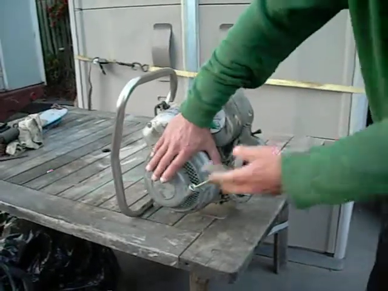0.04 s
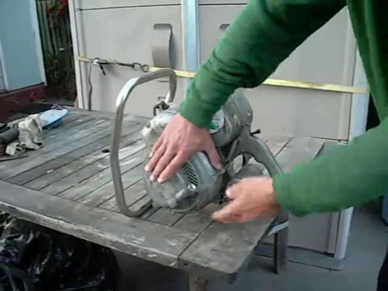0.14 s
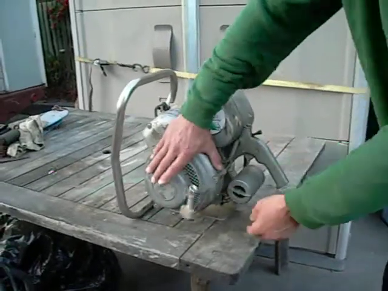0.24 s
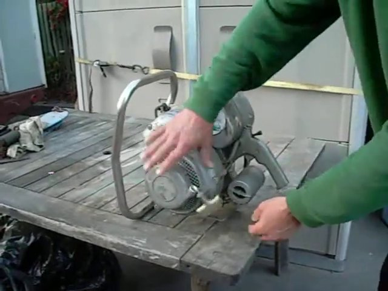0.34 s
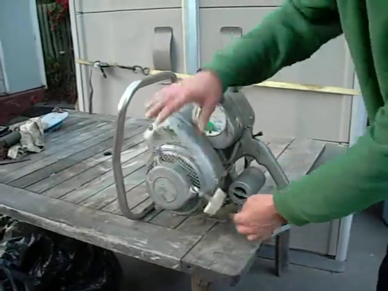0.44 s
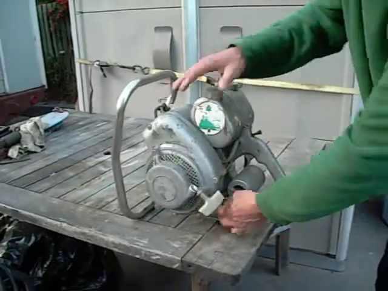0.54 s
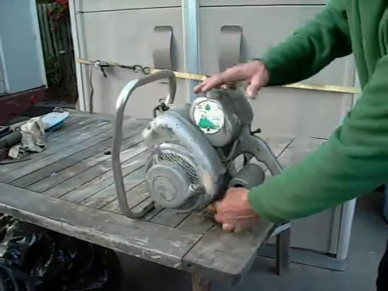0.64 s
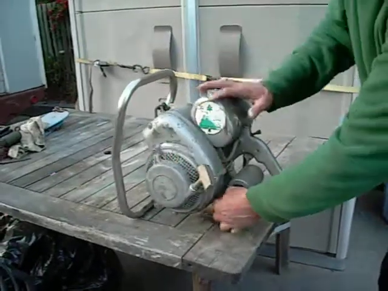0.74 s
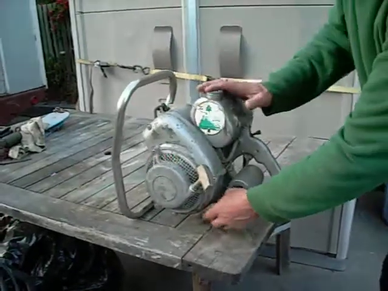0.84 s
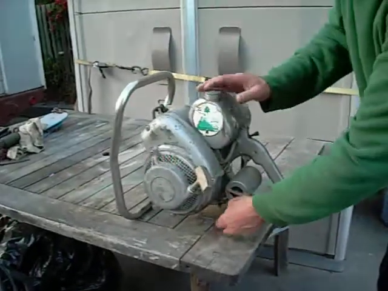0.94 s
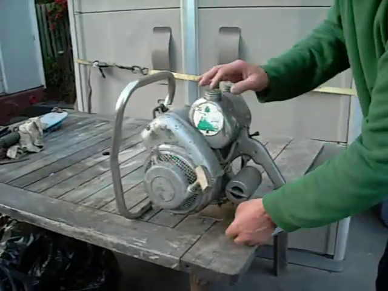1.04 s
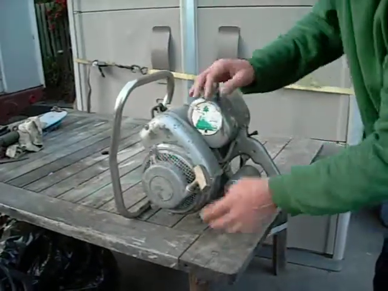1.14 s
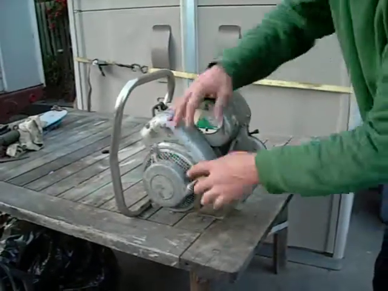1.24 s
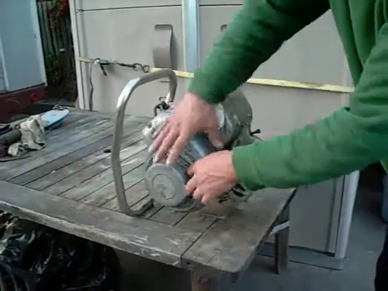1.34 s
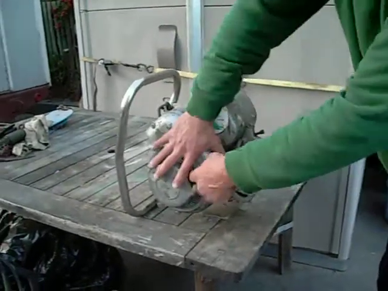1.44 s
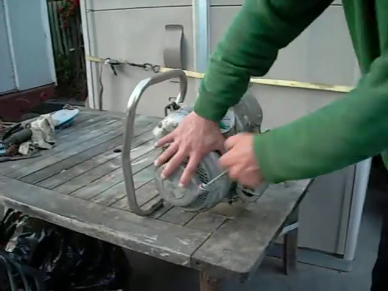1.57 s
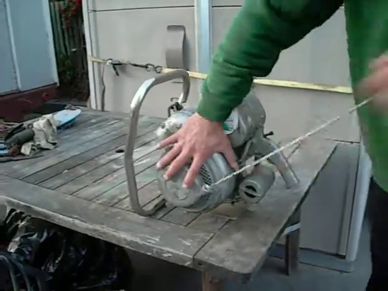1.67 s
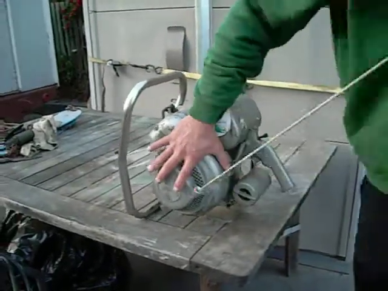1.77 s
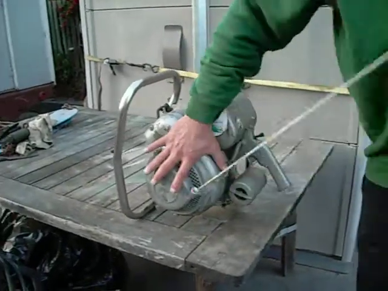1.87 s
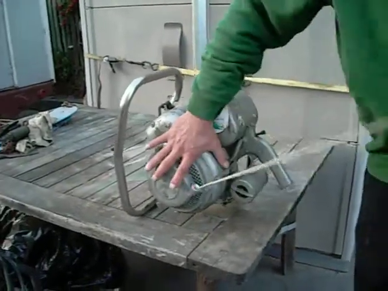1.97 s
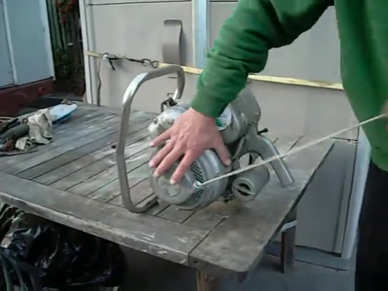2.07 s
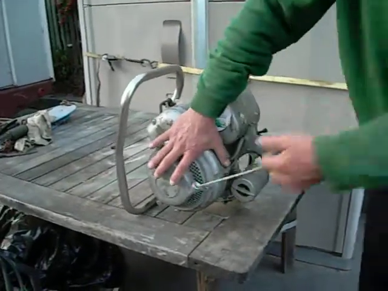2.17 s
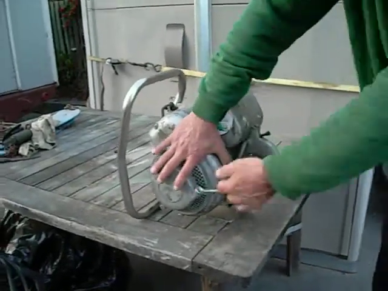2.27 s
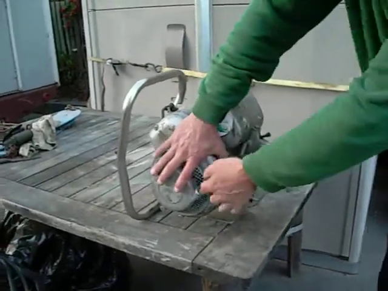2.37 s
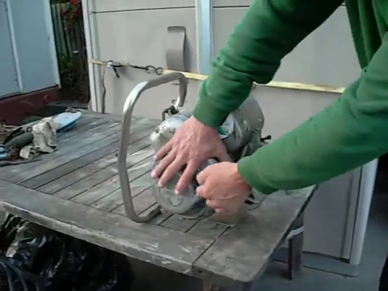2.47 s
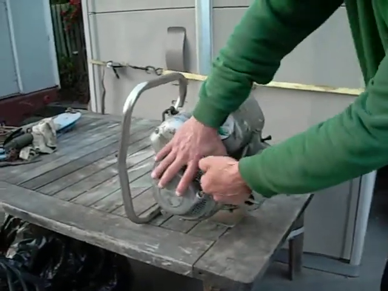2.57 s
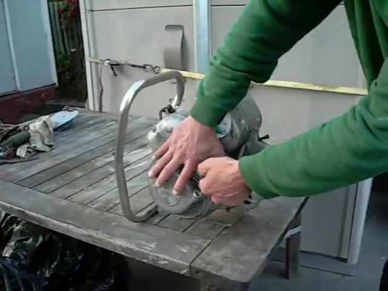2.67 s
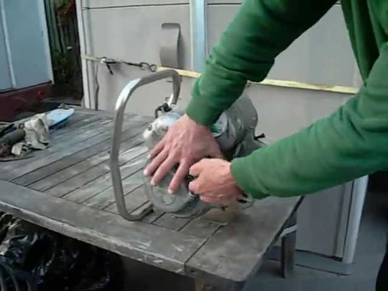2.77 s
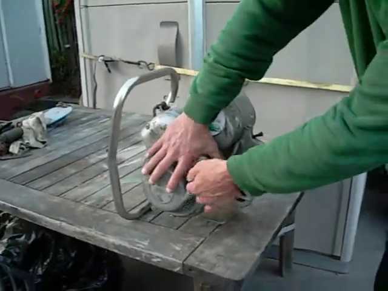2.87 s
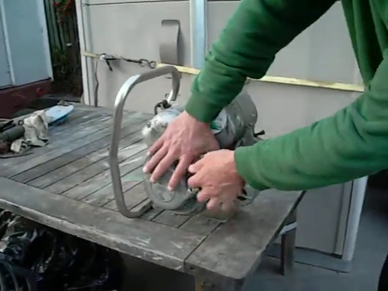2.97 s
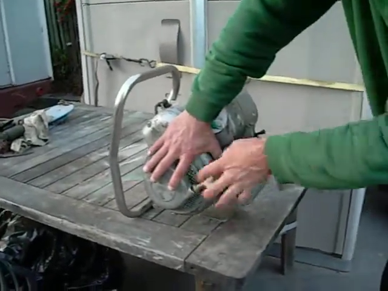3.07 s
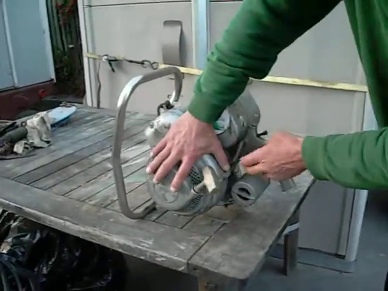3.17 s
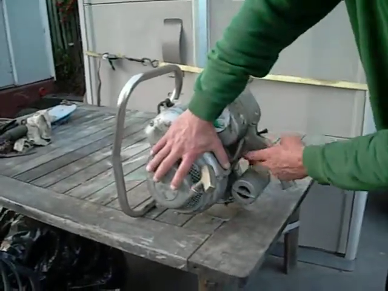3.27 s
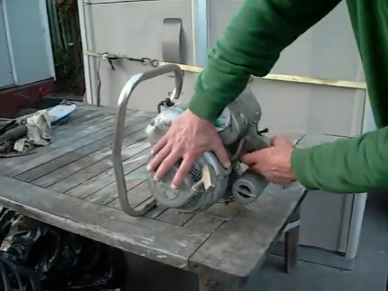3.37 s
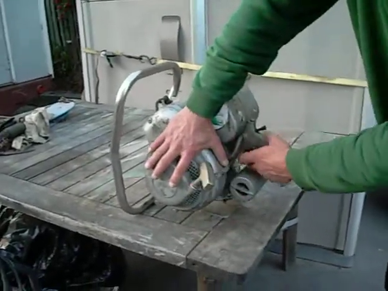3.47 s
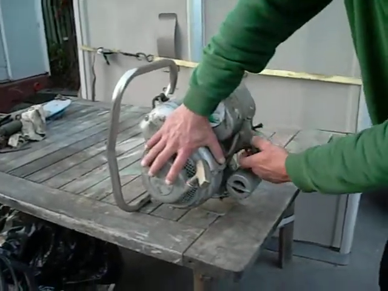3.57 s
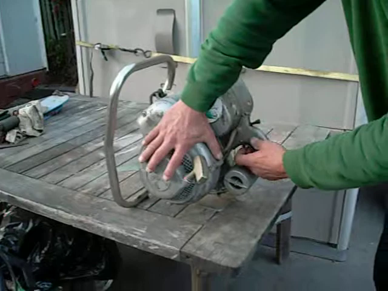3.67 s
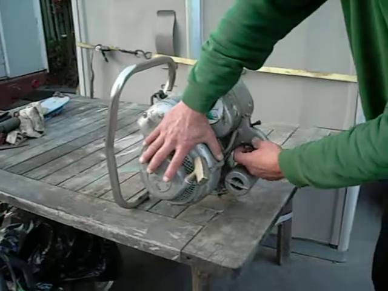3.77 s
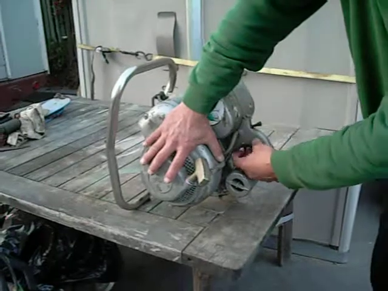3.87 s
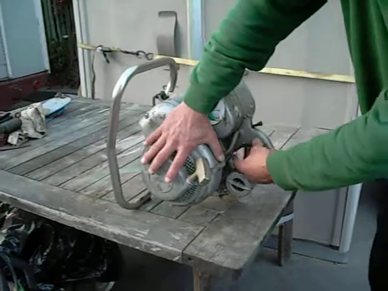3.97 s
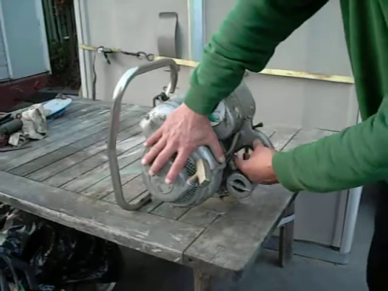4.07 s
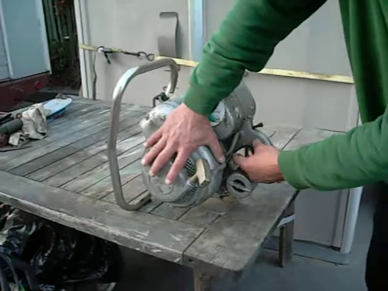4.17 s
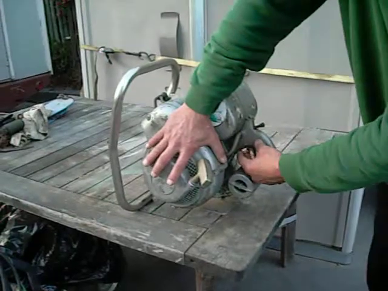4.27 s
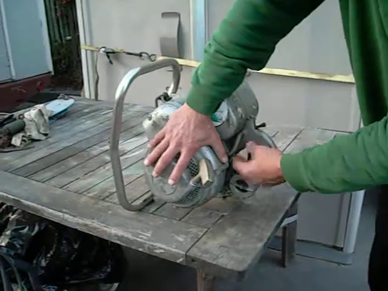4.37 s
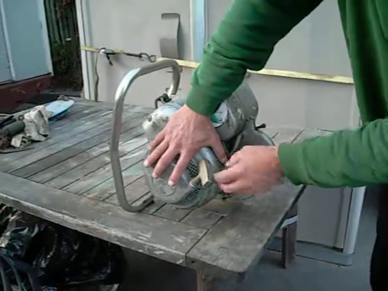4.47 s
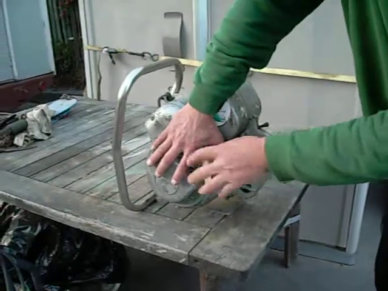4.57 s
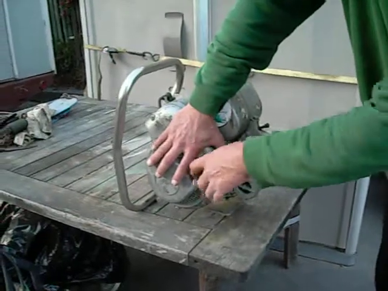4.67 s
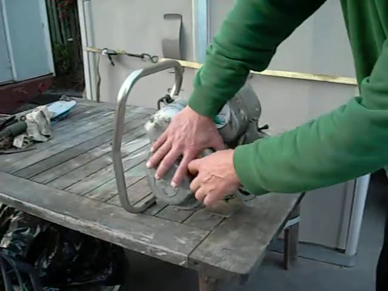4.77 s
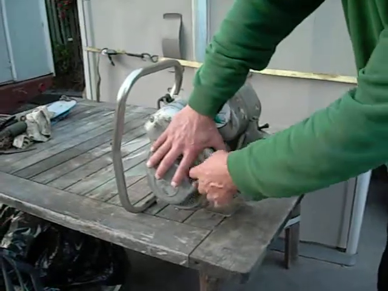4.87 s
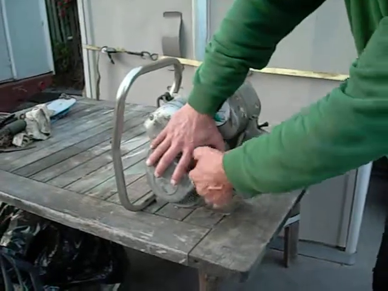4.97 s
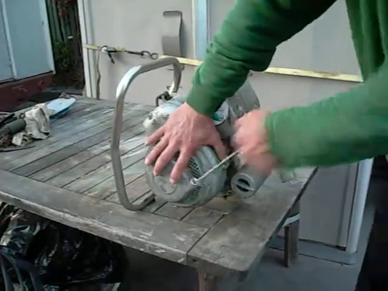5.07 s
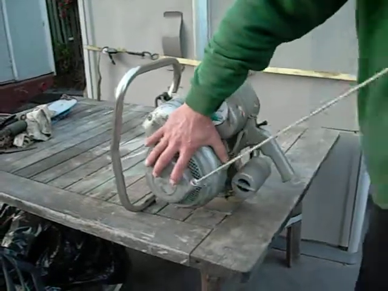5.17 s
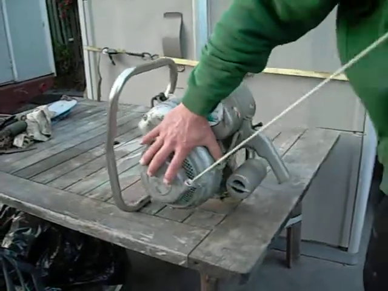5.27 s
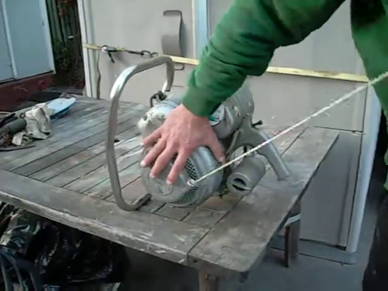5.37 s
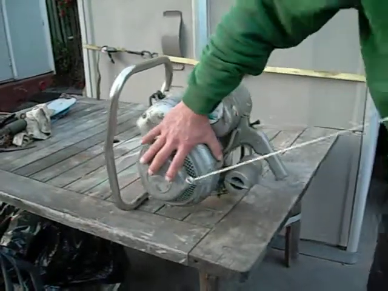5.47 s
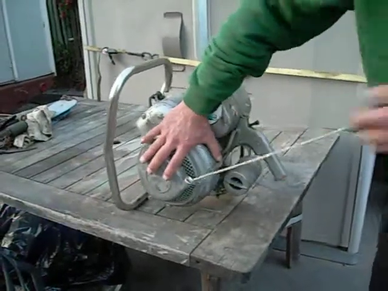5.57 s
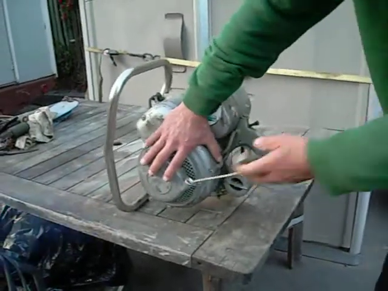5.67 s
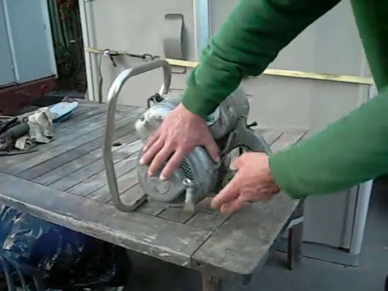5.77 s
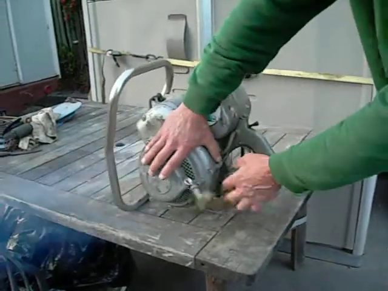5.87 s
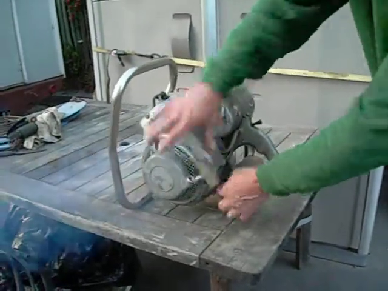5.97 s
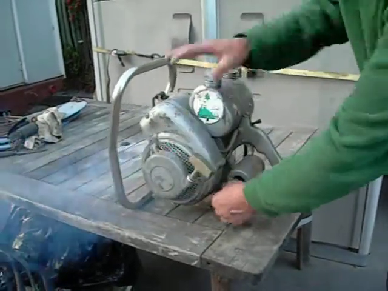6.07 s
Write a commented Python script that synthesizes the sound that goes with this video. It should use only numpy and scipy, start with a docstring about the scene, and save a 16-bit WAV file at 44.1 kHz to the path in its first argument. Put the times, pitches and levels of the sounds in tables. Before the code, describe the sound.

A two-stroke chainsaw putters down and stops with hard metal clanks. The rewinding starter squeals thinly among small ticks. A rope pull rasps and coughs briefly without catching, then come grip rattles and lever snaps over faint yard noise. The last pull catches, revving rapidly into a loud, buzzing roar. Outdoors, very close, dull and clipped microphone.

```python
"""In a yard beside a shed wall, an old two-stroke chainsaw on a wooden table is started by its rope, close to a
small overloaded microphone. It coasts to a stop, the rewinding rope makes the starter sing, a second pull fails,
levers snap, and the third pull catches. Exhaust puffs are timed by the crank and ring the muffler; at speed the
engine fires only every second or third turn. Shaken metal is dense noise bursts, struck metal is fading sines,
and the microphone clips it all and dulls it."""
import sys
import numpy as np
from scipy import signal
from scipy.fft import rfft, irfft
from scipy.io import wavfile

SR = 44100
rng = np.random.default_rng(int(sys.argv[2]) if len(sys.argv) > 2 else 0)


def transcribe(u):
    """Save the signal u as a 16-bit wav file named by the first command-line argument.

    u: samples, shape (n,) or (channels, n), limited to [-1, 1]; the rate is SR.
    q: integer samples, one column per channel.
    """
    v = np.clip(np.atleast_2d(u).T, -1, 1)
    q = np.round(v * 32767).astype(np.int16)
    wavfile.write(sys.argv[1], SR, q)


N = 269892
TIME = np.arange(N) / SR  # seconds

# All dB in the tables are relative levels.
# Outdoor background. Each row: frequency in Hz, level in dB per Hz.
YARD_COLOUR = [(20, -4), (45, -1), (100, -3.5), (200, -10), (400, -13), (750, -4.5), (1150, -6.5),
               (1500, -10.5), (2200, -11.5), (2700, -17.5), (3700, -13), (4300, -17), (5500, -69)]
YARD_DB = -38

# Crank speed while coasting, in the failed pull and in the start. Each row: time in s, turns a second.
COAST = [(-0.021, 31.1), (0.1, 27.1), (0.25, 24.1), (0.4, 18.4), (0.52, 14.2), (0.6, 10.2), (0.7, 1.4)]
FAILED_PULL = [(1.63, 8.9), (1.72, 24.5), (1.8, 16.4), (1.88, 16.2), (1.92, 13), (1.98, 2.7), (2.21, 2.1)]
START = [(5.153, 20.4), (5.22, 17.5), (5.33, 23.7), (5.42, 35.4), (5.52, 54.9), (5.62, 75.8), (5.72, 91.5),
         (5.8, 96.3), (5.9, 104.7), (6.0, 109.2), (6.13, 105.0)]
# Misfiring. Each row: from this time in s, turns per exhaust puff.
MISFIRE = [(-1, 1), (5.76, 2), (5.9, 2.5), (6.015, 3)]

# A hand shifts its grip. Each row: time in s, half length in s, rattle in dB, rub in dB.
GRIPS = [(1.519, 0.12, -32, -49), (2.474, 0.04, -46, -63), (2.717, 0.05, -36, -40.5),
         (3.166, 0.062, -38.5, -66), (3.286, 0.059, -35, -38), (4.807, 0.045, -36.5, -69)]
# Light ticks of pawls and rope handle. Each row: time in s, level in dB.
TICKS = [(0.8034, -16), (0.8624, -20.5), (0.8899, -16.5), (0.9089, -23), (0.9437, -16), (1.07, -22),
         (1.11, -20), (1.171, -23.5), (1.363, -17.5), (1.477, -17.5), (2.4279, -24), (2.449, -18),
         (2.4823, -16), (2.609, -22), (2.679, -20), (2.699, -19), (2.7312, -26), (2.9702, -22.5),
         (3.1182, -20.5), (3.17, -17), (4.2004, -21.5), (4.4613, -20.5), (4.8546, -17.5)]
# Ringing tones (modes) of the metal case. Each row: frequency in Hz, level in dB, time to fade by 60 dB in s.
CASE_MODES = [(1125, -22, 0.52), (1670, -28, 0.22), (1970, -12.5, 0.18), (2330, -52, 0.42),
              (2660, -22, 0.31), (2780, -26.5, 0.11), (3130, -2.5, 0.19), (3060, -41, 0.52),
              (3370, 0, 0.073), (3556, -7, 0.44), (3560, 7, 0.15), (3862, 12.5, 0.058)]
# Hard knocks of starter and levers. Each row: time in s, level in dB, 60 dB fade time of the contact in s,
# case ring in dB, thud in dB, note of the struck part in Hz, level of that note in dB.
KNOCKS = [(0.469, 8, 0.154, -26.5, -10.5, 2832, -0.5), (0.531, -1, 0.24, -21, -28, 2950, -4.5),
          (.635, 6, 0.071, -29, -12, 2360, -11.5), (0.676, 17, 0.037, -32, -5.5, 2643, -2),
          (0.771, -15.5, .05, -20, -28, 3830, -2), (1.602, 1, 0.064, -23, -8.5, 2820, 3),
          (1.621, -8, 0.039, -16.5, 5.5, 2550, 12.5), (2.226, -1.5, 0.046, -19, -6, 3680, -5),
          (2.254, -2.5, 0.065, -34, -13.5, 2460, -5), (2.307, -16.5, 0.05, -42, -22, 675, 2.5),
          (3.292, -4, 0.05, -24.5, -28, 3200, -1), (3.479, -22.5, 0.13, -18, -35, 2806, 10),
          (3.49, 3, 0.1, -12.5, -18, 1183, -6.5), (3.504, -5.5, 0.11, -42, -40.5, 3710, 9),
          (4.107, -5.5, 0.065, -14, -56, 2310, -85), (4.113, -10, 0.069, -45.5, -9.5, 3127, -4.5),
          (5.012, -20.5, 0.05, -22, -15, 1830, 1), (5.021, -0.5, 0.036, -57, -13, 790, -1),
          (5.023, -35.5, 0.54, -37, 8.5, 1830, 14.5), (5.078, -9, 0.11, -35, -9, 2940, -0.5),
          (5.097, 4, 0.061, -7, 0, 716, 0.5)]

# Slips that set the starter singing. Each row: time in s, upper group in dB, lower group in dB.
SLIPS = [(0.781, -21, -24), (0.97, -27, -24), (1.099, -26.5, -36), (1.158, -25.5, -28),
         (1.201, -17.5, -32.5), (1.273, -14.5, -37), (1.395, -21, -46), (2.269, -26.5, -52)]
# Their close tones, upper and lower group. Each row: frequency in Hz, level in dB.
SQUEAL_HIGH = [(3554, 1), (3500, -4.5), (4440, -8.5)]
SQUEAL_LOW = [(1625, -8.5), (1550, -16)]
# 60 dB fade times in s: upper group, lower group.
SLIP_FADE_S = [0.49, 1.5]
SLIP_RISE_S = 0.037

# Ringing tones of the clutch drum. Each row: frequency in Hz, level in dB, 60 dB fade time in s.
DRUM_MODES = [(1553, -9.5, 1.1), (1615, -11, 5.3), (1790, -5, 0.95), (3560, -4, 0.6), (3410, 0.5, 0.3)]
# Blows on the drum. Each row: time in s, level in dB, frequency in Hz favoured by the point of contact.
DRUM_BLOWS = [(0.639, -7.5, 1820), (2.254, -17, 1560), (5.02, -17.5, 1590)]

# The rope runs through the starter, out or back. Each row: start in s, length in s, level in dB.
ROPE_RUNS = [(1.629, 0.25, 0), (1.896, 0.34, 0.5), (5.084, 0.8, 3.5)]
ROPE_PEAK_SHARE = 0.64  # part of a run spent gathering speed

# Tone colour of metal striking metal. Each row: frequency in Hz, level in dB.
CLATTER_COLOUR = [(30, -41), (110, -10.5), (220, -3), (420, -1), (750, 4), (1200, 0.5), (1600, -0.5),
                  (2200, 1.5), (2900, 0.5), (3600, 1), (4300, 0), (6000, -34.5)]
# Resonances kept ringing by the rattling chain. Each row: frequency in Hz, width in Hz, level in dB.
RATTLE_RINGS = [(1607, 170, -11.5), (2843, 280, -12.5)]
# Shaking by the crank: dB at full strength, knee in turns a second, steepness.
SHAKE_DB, SHAKE_KNEE, SHAKE_POWER = 14, 24.2, 2.545
# Loose parts settle after the crank stops.
SETTLE_DB, SETTLE_FADE_S = -25, 0.56

# Even note of the engine as it catches. Each row: time in s, level in dB.
DRONE_LEVEL = [(5.35, -39), (5.5, -9), (5.62, 3), (5.76, 5.5), (5.84, -2), (6.12, -7)]
# The muffler's pass band for that note. Each row: frequency in Hz, level in dB.
DRONE_COLOUR = [(150, -27), (340, 0), (450, -7), (590, 0), (740, -8.5), (850, 0.5), (1100, -12),
                (1500, -39)]
# Exhaust gusts at the microphone. Each row: time in s, level in dB.
GUSTS = [(5.1, -60), (5.25, -37), (5.45, -28), (5.62, -3.5), (5.8, -2), (5.95, 0), (6.12, -3)]

# Muffler resonances. Each row: frequency in Hz before a small chance detuning, time to peak in s, level in dB.
MUFFLER = [(227.4, 0.0032, -6), (364, 0.0018, -5.5), (533.6, 0.0021, -6), (675, 0.0017, -5.5),
           (867.4, 0.0029, -6), (1553, 0.002, -10.5)]
# The outlet's own ring: frequency in Hz before that detuning, time to peak in s.
OUTLET = (597, 0.0032)
# Outlet ring in dB at 20 turns a second: coast, failed pull, start.
OUTLET_DB = [-2.5, -7, -10.5]
OUTLET_DB_PER_OCTAVE = 5  # faster gas rings the outlet more
# Muffler part of a puff: dB at full strength, turns a second at half strength.
PUFF_DB, PUFF_KNEE = 12, 15.6
# Low blast at 20 turns a second, before and after the charge begins to burn.
IGNITION_S, COLD_BLAST_DB, HOT_BLAST_DB = 5.36, -13.5, 1.5
BLAST_DB_PER_OCTAVE = -1.5  # a slow piston pushes out more at once

TOP_HZ = 15900


def undb(db):
    """Turn decibels into a gain."""
    return 10 ** (np.asarray(db) / 20)


def curve(table, t=TIME):
    """Join the points of each column by straight lines, read at t."""
    x, *columns = np.transpose(table)
    return [np.interp(t, x, column) for column in columns]


def unit(x):
    """Scale to an average (rms) level of 1."""
    return x / np.sqrt(np.mean(x ** 2))


def colour(x, points):
    """Shape the spectrum by (Hz, dB) points, to rms 1."""
    hz, db = np.transpose(points)
    f = np.maximum(np.arange(len(x) // 2 + 1) * SR / len(x), 1)
    gain = undb(np.interp(np.log(f), np.log(hz), db))
    return unit(irfft(rfft(x) * gain, len(x)))


def high_pass(x, order, cut_hz):
    """Weaken everything below the cut."""
    return signal.sosfilt(signal.butter(order, cut_hz, "high", fs=SR, output="sos"), x)


def band_noise(lo_hz, hi_hz):
    """Noise between two edges, at rms 1."""
    band = signal.butter(2, [lo_hz, hi_hz], "band", fs=SR, output="sos")
    return unit(signal.sosfilt(band, rng.standard_normal(N)))


def snippet(noise, length):
    """Take a piece of noise from a random place."""
    return np.roll(noise, rng.integers(N))[:length]


def walk(rate):
    """Wander by chance, with a spread near 1 and a new target `rate` times a second."""
    points = rng.standard_normal(400)
    return 1.2 * np.interp(TIME * rate, np.arange(len(points)), points)


def fade(t, t60):
    """Die away by 60 dB in t60 seconds."""
    return np.exp(-np.log(1000) * t / t60)


def hump(s, half_s):
    """Swell smoothly around time s."""
    return np.exp(-((TIME - s) / half_s) ** 2)


def swell(t, peak_s):
    """Rise to 1 at peak_s, then die away."""
    return t / peak_s * np.exp(1 - t / peak_s)


def ring(modes, t):
    """A struck object sounds as several sines, each fading at its own pace."""
    return sum(undb(db) * fade(t, t60) * np.sin(2 * np.pi * (hz * t + rng.random())) for hz, db, t60 in modes)


def add(out, s, sound):
    """Mix a sound in at time s."""
    i = int(s * SR)
    if 0 <= i < N:
        out[i:i + len(sound)] += sound[:N - i]


def effort(speed, knee):
    """Share of full strength at a crank speed: rises from 0 and levels off at 1."""
    return speed / (speed + knee)


def yard():
    """Steady outdoor background: noise with a fixed tone colour."""
    return colour(rng.standard_normal(N), YARD_COLOUR) * undb(YARD_DB)


def walls(x, wet_db=-19, t60=0.35):
    """The table and the shed wall throw back a short echo, here a fading noise tail."""
    t = TIME[:SR // 3]
    echo = band_noise(131, 3000)[:len(t)] * fade(t, t60) * (t > .004)
    return x + undb(wet_db) * np.std(x) * unit(signal.fftconvolve(x, echo)[:N])


def rub(grip_db=3):
    """Hand and sleeve rub on the case at each change of grip: unsteady low noise."""
    level = sum(undb(db) * hump(s, half_s) for s, half_s, _, db in GRIPS)
    return band_noise(430, 680) * level * undb(grip_db * walk(39))


def ticks(gain_db=-1, t60=0.062, rise_s=0.0006, ring_db=-25):
    """Pawls and the rope handle scrape and tick lightly, ringing the case faintly."""
    out, t, scrape = np.zeros(N), TIME[:SR // 4], band_noise(2300, 6400)
    for s, db in TICKS:
        touch = snippet(scrape, len(t)) * fade(t, t60)
        touch = touch + undb(ring_db) * ring(CASE_MODES, t)
        add(out, s, undb(db + gain_db) * touch * (1 - np.exp(-t / rise_s)))
    return out


def squeal(waver_hz=1.24):
    """Each slip of the rewinding starter pumps up close tones, which beat as they ring down."""
    times, *levels = np.transpose(SLIPS)
    out = np.zeros(N)
    for tones, slip_db, t60 in zip((SQUEAL_HIGH, SQUEAL_LOW), levels, SLIP_FADE_S):
        swells = []
        for s, db in zip(times, slip_db):
            shape = np.where(TIME < s, hump(s, SLIP_RISE_S), fade(np.abs(TIME - s), t60))
            swells.append(undb(db) * shape)
        level = np.max(swells, axis=0)  # the strongest slip at each moment
        for hz, db in tones:
            turns = np.cumsum(hz + waver_hz * walk(5.23)) / SR
            out += np.sqrt(2) * level * undb(db) * np.sin(2 * np.pi * turns)
    return out


def drum(reach_hz=170, rest_db=-11):
    """The struck clutch drum rings on; tones far from the one favoured by the contact are weaker."""
    out = np.zeros(N)
    for s, blow_db, favoured_hz in DRUM_BLOWS:
        modes = []
        for hz, db, t60 in DRUM_MODES:
            away = 1 - np.exp(-((hz - favoured_hz) / reach_hz) ** 2)
            modes.append((hz, db + rest_db * away, t60))
        add(out, s, undb(blow_db) * ring(modes, TIME[:2 * SR]))
    return out


def knocks(contact_s=0.00038, note_stretch=0.6, modes_db=-2, jingle_db=0, jingle_t60=0.22):
    """Heavy blows: a crack, a thud of the table, the struck part's note and the case with its jingling chain."""
    out, t = np.zeros(N), TIME[:SR // 2]
    crack, thud, jingle = band_noise(1700, 5530), band_noise(300, 1400), band_noise(2200, 4200)
    for s, db, t60, ring_db, thud_db, hz, note_db in KNOCKS:
        contact = snippet(crack + undb(thud_db) * thud, len(t)) * fade(t, t60)
        chain = undb(jingle_db) * snippet(jingle, len(t)) * fade(t, jingle_t60)
        case = undb(ring_db) * (undb(modes_db) * ring(CASE_MODES, t) + chain)
        note = ring([(hz, note_db, note_stretch * t60)], t)  # dies sooner than the contact
        add(out, s, undb(db) * (contact + case + note) * (1 - np.exp(-t / contact_s)))
    return out


def impacts(rate, grain_db, t60):
    """Dense metal impacts, `rate` a second at random, each a brief burst of noise; rms 1."""
    sizes = (rng.random(N) < rate / SR) * undb(grain_db * np.minimum(rng.exponential(size=N), 4))
    energy = signal.fftconvolve(sizes ** 2, fade(TIME[:SR // 20], t60) ** 2)[:N]
    return colour(np.sqrt(np.abs(energy)) * rng.standard_normal(N), CLATTER_COLOUR)


def rope(power=0.62, cut_hz=950, jerk_db=4):
    """Rope and ratchet rasp, coarser and thinner than the chain, swelling in jerks with the rope's speed."""
    level = np.zeros(N)
    for s, length, db in ROPE_RUNS:
        speed = np.interp(TIME, [s, s + ROPE_PEAK_SHARE * length, s + length], [0, 1, 0])
        level += undb(db) * speed ** power
    rasp = high_pass(impacts(rate=350, grain_db=2, t60=0.03), 1, cut_hz)
    return unit(rasp) * level * undb(jerk_db * walk(35))


def shaking(angle, swing_db=8, swing_knee=30, lead=0.035):
    """How hard the metal is shaken: by the crank, by settling parts and by the hand."""
    speed = sum(np.interp(TIME, *np.transpose(run), left=0, right=0) for run in (COAST, FAILED_PULL, START))
    # a slow crank moves in jerks over compression; lead is in turns
    jerk_db = swing_db * (1 - effort(speed, swing_knee)) * np.cos(2 * np.pi * (angle + lead))
    engine = undb(SHAKE_DB + jerk_db) * effort(speed, SHAKE_KNEE) ** SHAKE_POWER
    settling = np.zeros(N)
    for run in (COAST, FAILED_PULL):
        add(settling, run[-1][0], undb(SETTLE_DB) * fade(TIME[:SR], SETTLE_FADE_S))
    hand = sum(undb(db) * hump(s, half_s) for s, half_s, db, _ in GRIPS)
    return np.sqrt(engine ** 2 + settling ** 2 + hand ** 2)


def clatter(angle, rattle_db=3.0):
    """Chain and case rattle as hard as they are shaken, and ring in a few damped resonances."""
    metal = impacts(rate=1100, grain_db=3.0, t60=0.0092)
    rings = np.zeros(N)
    for hz, width, db in RATTLE_RINGS:
        b, a = signal.iirpeak(hz, hz / width, fs=SR)
        rings += undb(db) * unit(signal.lfilter(b, a, metal))
    return unit(metal + rings) * shaking(angle) * undb(rattle_db * walk(60))


def buffet(flutter_db=3):
    """Exhaust gusts strike the microphone once the engine burns: fluttering, very low noise."""
    return band_noise(14, 68.3) * undb(curve(GUSTS)[0] + flutter_db * walk(13))


def drone(angle, count=18):
    """Regular port openings give multiples of the crank speed, which climb through the muffler's pass band."""
    speed = np.maximum(np.gradient(angle) * SR, 0)
    orders = np.zeros(N)
    for k in range(3, count):
        passed = undb(curve(DRONE_COLOUR, k * speed)[0])
        orders += passed * np.sin(2 * np.pi * (k * angle + rng.random()))
    return orders * undb(curve(DRONE_LEVEL)[0]) * (TIME > DRONE_LEVEL[0][0])


def crank(run):
    """Add up crank speed into turns; give the puffs as (s, turns a second) and the angle in turns."""
    t = np.arange(run[0][0], run[-1][0], 1 / SR)
    turns = np.cumsum(curve(run, t)[0]) / SR
    puffs, k = [], 0
    while np.ceil(k) < turns[-1]:  # puffs fall on whole turns
        s = np.interp(np.ceil(k), turns, t)
        puffs.append((s, curve(run, s)[0]))
        k += [step for since, step in MISFIRE if since <= s][-1]
    return puffs, np.interp(TIME, t, turns)


def exhaust(puffs, scatter_db=-2.9, detune=0.022, gas_db=-16, gas_s=0.0044,
            blast_hz=70, blast_s=0.0018, lead_s=0.00424, cut_hz=175):
    """Each puff gives a low blast; just after it the muffler's resonances swell with a rush of gas."""
    muffler, blasts = np.zeros((2, N))
    t, gas = TIME[:SR // 12], band_noise(200, 630)
    for s, speed, outlet_db in puffs:
        size = undb(PUFF_DB) * effort(speed, PUFF_KNEE)
        octaves = np.log2(speed / 20)
        blast_db = HOT_BLAST_DB if s > IGNITION_S else COLD_BLAST_DB
        blast_db += BLAST_DB_PER_OCTAVE * octaves
        modes = list(MUFFLER) + [(*OUTLET, outlet_db + OUTLET_DB_PER_OCTAVE * octaves)]
        chance = rng.standard_normal(len(modes) + 2)  # no two puffs are alike
        pipe = np.zeros(len(t))
        for (hz, peak_s, db), c in zip(modes, chance):
            pipe += undb(db) * swell(t, peak_s) * np.sin(2 * np.pi * hz * (1 + detune * c) * t)
        rush = undb(gas_db) * swell(t, gas_s) * snippet(gas, len(t))
        add(muffler, s, size * undb(scatter_db * chance[-1]) * (pipe + rush))
        blast = swell(t, blast_s) * np.cos(2 * np.pi * blast_hz * t)
        add(blasts, s - lead_s, undb(blast_db + 2 * chance[-2]) * blast)
    # the small muffler radiates little below its lowest resonance
    return high_pass(muffler, 2, cut_hz) + blasts


def scene():
    """The saw with its echo, its other noises and the yard."""
    runs = [crank(run) for run in (COAST, FAILED_PULL, START)]
    puffs = []
    for (run_puffs, _), outlet_db in zip(runs, OUTLET_DB):
        puffs += [(s, speed, outlet_db) for s, speed in run_puffs]
    # each run starts from compression
    coast_angle, pull_angle, start_angle = [angle for _, angle in runs]
    angle = np.select([TIME < FAILED_PULL[0][0], TIME < START[0][0]], [coast_angle, pull_angle], start_angle)
    saw = rub() + ticks() + knocks() + rope() + clatter(angle) + exhaust(puffs)
    return (yard() + walls(saw) + squeal() + drum() + buffet() + drone(angle))[None]


def record(dry, input_limit=0.77, output_limit=0.71, band_hz=3900):
    """The microphone stage clips hard, a narrow voice band follows, and its overshoots are clipped again."""
    clipped = np.clip(dry, -input_limit, input_limit)
    narrow = signal.sosfiltfilt(signal.butter(10, band_hz, fs=SR, output="sos"), clipped)
    flat = np.clip(narrow, -output_limit, output_limit)
    return signal.sosfiltfilt(signal.ellip(8, .1, 60, TOP_HZ, fs=SR, output="sos"), flat)


dry = scene()
out = record(dry)
transcribe(out)
```